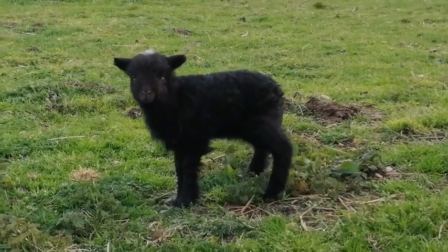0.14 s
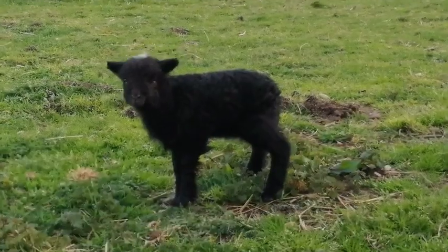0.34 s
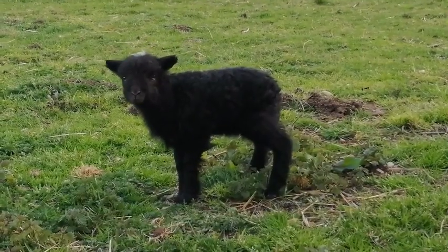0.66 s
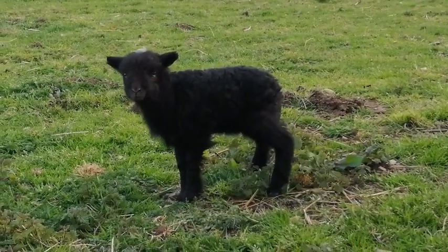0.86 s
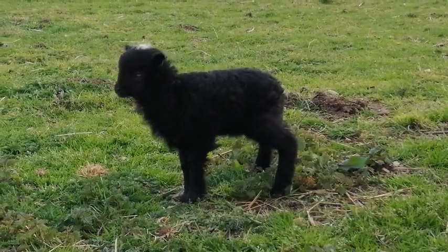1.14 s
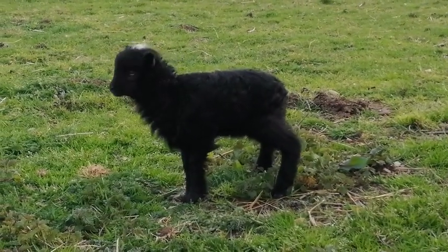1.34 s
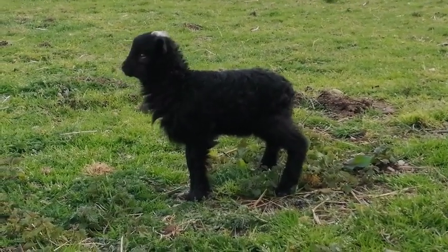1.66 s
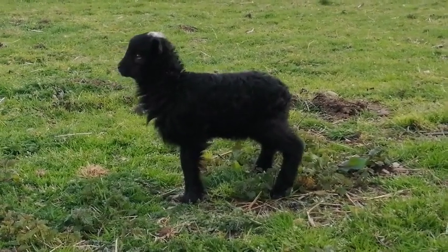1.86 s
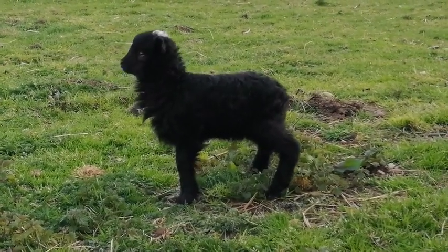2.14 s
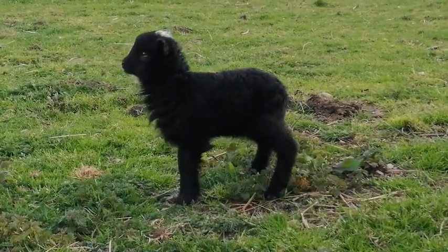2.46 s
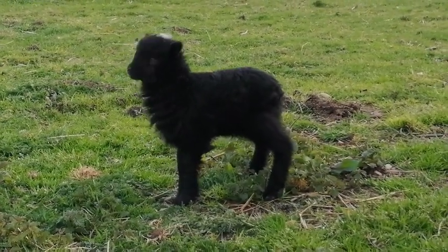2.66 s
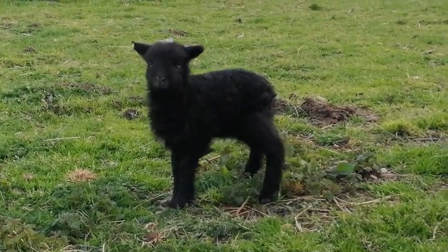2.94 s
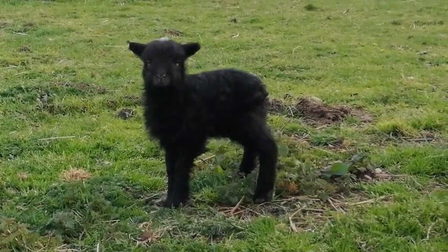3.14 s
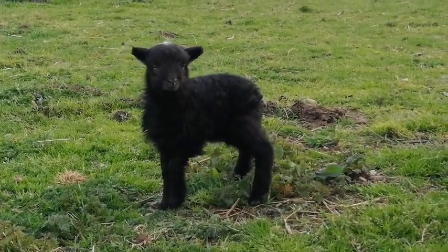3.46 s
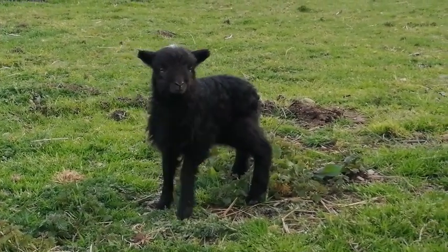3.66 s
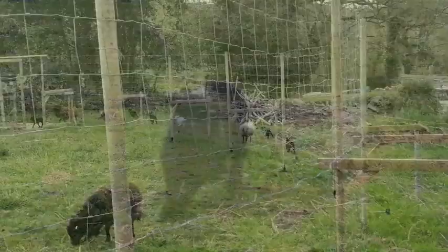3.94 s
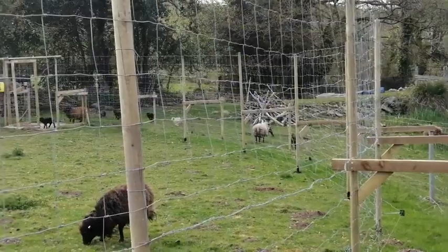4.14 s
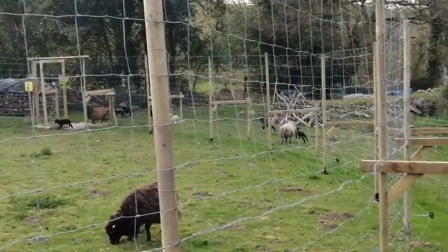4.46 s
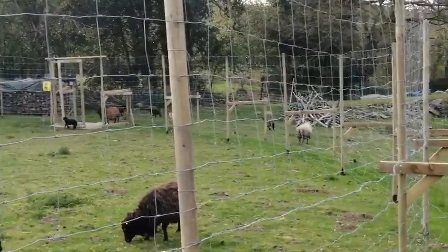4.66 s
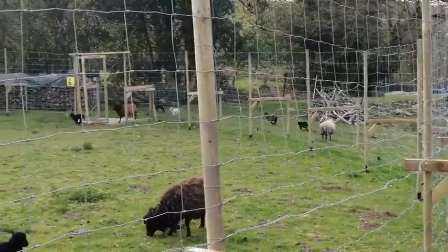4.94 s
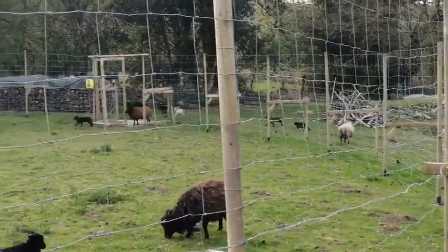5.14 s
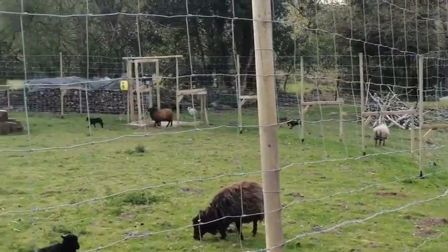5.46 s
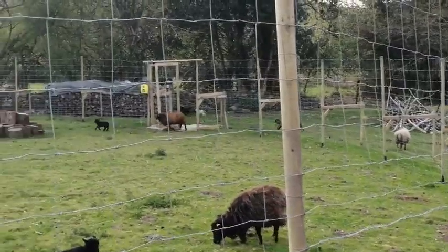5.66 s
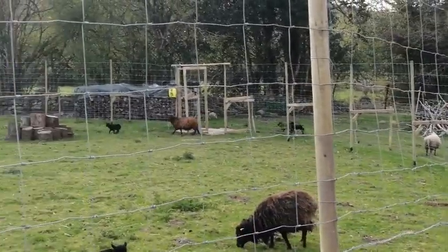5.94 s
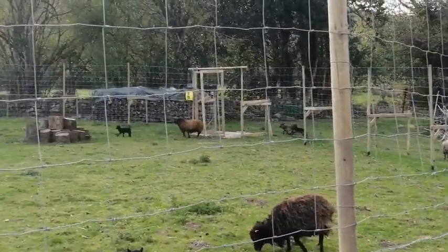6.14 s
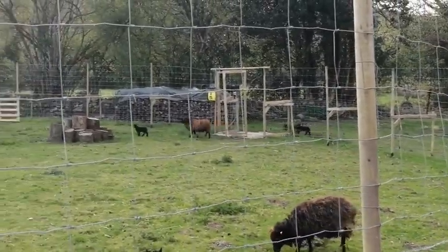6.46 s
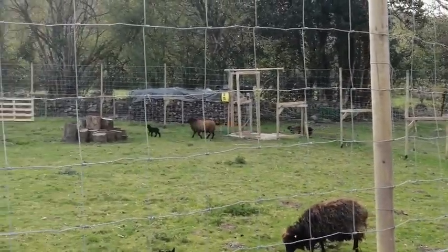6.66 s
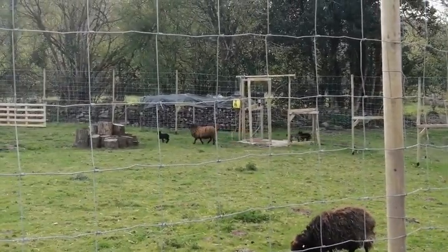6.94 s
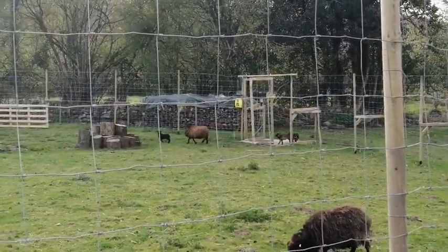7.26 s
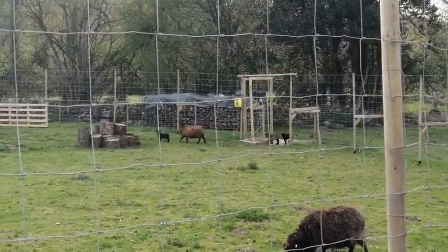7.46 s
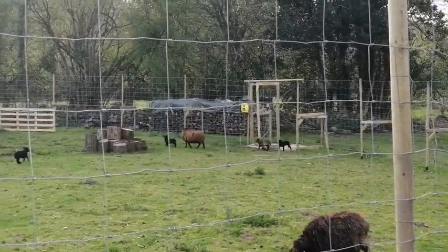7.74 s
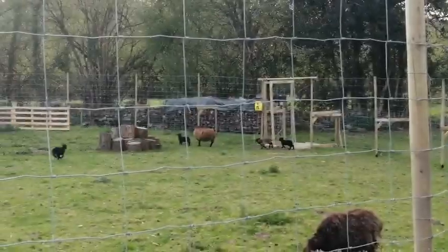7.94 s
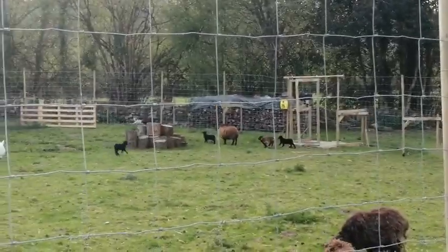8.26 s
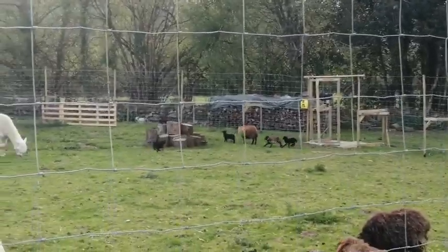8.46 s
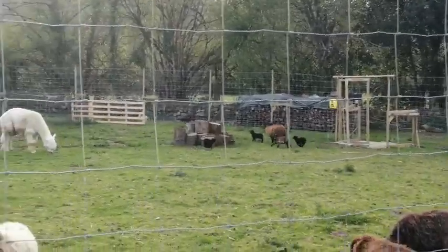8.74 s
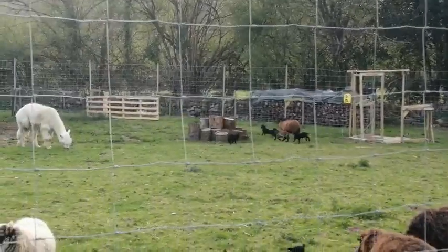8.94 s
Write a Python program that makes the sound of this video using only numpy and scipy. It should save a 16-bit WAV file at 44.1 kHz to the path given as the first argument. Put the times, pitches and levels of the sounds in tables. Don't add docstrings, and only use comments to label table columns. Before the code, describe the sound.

Outdoor pasture on a small handheld microphone. Faint hum, hiss and distant birds come first, then a lamb gives one nasal, quivering bleat. A louder ewe follows at once with a deep, rapidly throbbing bleat. A far lamb calls faintly, nearby songbirds whistle, soft hooves thud and wind bumps the microphone. A second ewe bleat, softer and duller, overlaps another distant lamb while birds keep singing.

```python
import sys
import numpy as np
from scipy import signal
from scipy.fft import rfft, irfft, next_fast_len
from scipy.io import wavfile
from scipy.ndimage import uniform_filter1d, map_coordinates

SR = 44100
rng = np.random.default_rng(int(sys.argv[2]) if len(sys.argv) > 2 else 0)


def transcribe(u):
    v = np.clip(np.atleast_2d(u).T, -1, 1)
    q = np.round(v * 32767).astype(np.int16)
    wavfile.write(sys.argv[1], SR, q)


def to_linear_factor(level_db):
    exponent = np.asarray(level_db, float) / 20
    return 10 ** exponent


N = 401751
TIME = np.arange(N) / SR
CHANGE_S = 3.69
VALLEY_HZ = 2054

# time into the note in seconds, pitch in Hz, level in dB.
SWOOP = [(0, 5390, -11.5), (.011, 6700, -16), (.02, 6510, -39), (.035, 5910, -18.5), (.053, 5580, 0),
         (.058, 5300, -16), (.068, 4600, -18.5), (.09, 3450, -31)]
RISE = [(0, 4280, -8.5), (.012, 4210, -3.5), (.03, 4500, -2), (.045, 5200, -2.5), (.058, 6700, -3.5)]
SLUR = [(0, 6600, -6), (.014, 7080, -1.5), (.05, 7130, -1.5), (.06, 7250, -8), (.1, 7600, -9.5)]
DROP = [(0, 6134, -16), (.011, 5940, 0), (.014, 5700, -9), (.024, 5490, -8.5)]
SEEP = [(0, 7440, -15.5), (.03, 7120, -3), (.08, 7100, -1), (.165, 6950, -8.5)]
FALL = [(0, 7710, -14.5), (.035, 6520, -10.5), (.048, 6450, 0.5), (.056, 6160, -15), (.082, 6400, -23.5),
        (.09, 5750, -5.5), (.115, 3950, -30)]
HOOK = [(0, 6050, -13), (.01, 7600, -26), (.02, 6620, 2), (.028, 6200, -24), (.036, 6400, -0.5),
        (.047, 6835, -3.5), (.056, 6700, -7)]
CREST = [(0, 5570, -9), (.03, 5640, -0.5), (.052, 6010, 2.5), (.07, 5500, -6), (.095, 4490, -21)]
DIP = [(0, 6200, -13), (.025, 5010, -5), (.045, 5000, 0), (.08, 5150, -9.5), (.16, 5190, -19)]
ARCH = [(0, 5900, -8), (.01, 6700, 5), (.022, 7640, -26), (.04, 7370, -4), (.055, 6900, 1.5)]
PIPE = [(0, 5170, -3), (0.031, 5280, -5.5), (0.061, 5100, -3.5)]
GLIDE = [(0, 5590, -10.5), (.03, 5424, 0), (.055, 5300, -13)]
FLICK = [(0, 5900, 2.5), (.008, 6090, -0.5), (0.014, 7230, -5.5)]
LIFT = [(0, 4220, -6.5), (0.022, 4300, 1), (.032, 4800, -4.5), (.044, 5270, 8)]
HOLD = [(0, 5770, -10), (.04, 5924, -4.5), (.085, 5850, -2), (.125, 5720, -24)]
CURL = [(0, 3080, -16), (.03, 2420, -1.5), (.055, 2400, -16), (.1, 3120, -13), (.125, 2800, -13),
        (.15, 2350, -2)]
WARBLE = [(0, 3085, 0), (.012, 2416, 3), (.021, 2620, -12), (.03, 3070, 7)]


def unit(x):
    return x / np.sqrt(np.mean(x ** 2) + 1e-20)


def along(points, hz):
    f, v = np.transpose(points)
    return np.interp(np.log(hz + 1), np.log(f + 1), v)


def curves(rows):
    s, *cols = np.transpose(rows)
    return [np.interp(TIME, s, c) for c in cols]


def wobble(rate):
    return map_coordinates(rng.standard_normal(int(N * rate / SR) + 4), [TIME * rate], order=1)


def lumps(rows, half_s):
    total = np.zeros(N)
    for s, db, *_ in rows:
        near = slice(round((s - 4 * half_s) * SR), round((s + 4 * half_s) * SR))
        total[near] += to_linear_factor(2 * db) * np.exp(-((TIME[near] - s) / half_s) ** 2)
    return np.sqrt(total)


def filtered(x, response):
    m = next_fast_len(len(x) + SR // 4)
    return irfft(rfft(x, m) * response(np.fft.rfftfreq(m, 1 / SR)), m)[:len(x)]


def rush(spectrum, patchy_db):
    z = signal.stft(rng.standard_normal(N), nperseg=512)[2]
    patches = uniform_filter1d(rng.standard_normal(z.shape), 6, 0)
    patches = uniform_filter1d(patches, 12, 1)
    patchy = signal.istft(z * to_linear_factor(patchy_db * unit(patches)), nperseg=512)[1][:N]
    return unit(filtered(patchy, lambda hz: to_linear_factor(along(spectrum, hz))))


def by_scene(before, after):
    return np.where(TIME < CHANGE_S, before, after)


def hum():
    # frequency in Hz, density in dB per Hz.
    hiss_spectrum = [(300, -20.5), (700, 5.5), (1300, -1.5), (3000, -1), (4250, -8), (5500, -10.5),
                     (7000, -13), (9000, -49.5)]
    # frequency in Hz, density in dB per Hz.
    drone_spectrum = [(30, -23), (70, -3.5), (330, 3), (600, -0.5), (850, -15), (1400, -36), (3000, -66)]
    # time in seconds, gain in dB.
    gain = [(0, 1.35), (2.3, 0.5), (2.5, -3.5), (3.2, -0.7), (3.5, 3.5), (3.7, -0.2), (5.5, 0.3), (7, -1),
            (9.11, 0)]
    gain_db, = curves(gain)
    hiss = to_linear_factor(by_scene(-72, -64) + gain_db + 10) * rush(hiss_spectrum, patchy_db=1.8)
    drone = to_linear_factor(by_scene(-60.5, -58) + 0.49 * gain_db + 3.5) * rush(drone_spectrum, patchy_db=2.0)
    return hiss + drone


def chorus():
    # frequency in Hz, density in dB per Hz.
    blur_spectrum = [(3000, -55), (4300, -14), (5200, -4), (5800, 1.5), (6900, -8.5), (7800, -13),
                     (9000, -66)]
    swell_db = 3 * np.cos(2 * np.pi * TIME / 2.5) * (TIME < CHANGE_S)
    return to_linear_factor(by_scene(-67.5, -57) + swell_db) * rush(blur_spectrum, patchy_db=2.2)


def wind():
    # frequency in Hz, density in dB per Hz.
    buffet_spectrum = [(10, -12), (35, 2), (70, -7), (130, -11.5), (300, -29.5), (800, -85)]
    # centre in seconds, peak in dB, half length in seconds.
    gusts = [(0.048, -85, .6), (1.877, -67, 0.13), (4.065, -66, .2), (4.84, -65, 0.036), (5.12, -56, 0.06),
             (6.025, -64, 0.2), (6.211, -50.5, 0.08), (6.622, -52.5, 0.023), (7.241, -70.5, 0.085),
             (7.537, -40, 0.087), (7.71, -48.5, 0.059), (8.072, -49, 0.068), (8.212, -54, 0.04),
             (8.867, -50, 0.045)]
    calm_db = -79.5
    force = to_linear_factor(calm_db) + sum(to_linear_factor(db) * np.exp(-((TIME - s) / length) ** 2) for s, db, length in gusts)
    return force * unit(to_linear_factor(1.5 * wobble(14)) * rush(buffet_spectrum, patchy_db=.6))


def hooves():
    # start in seconds, peak in dB, pitch in Hz.
    thuds = [(0.071, -49.5, 160), (1.819, -65, 100), (4.801, -43.5, 150), (5.12, -44, 125),
             (5.88, -50.5, 200), (6.456, -45, 147.3), (8.169, -45.5, 170.1)]
    total = np.zeros(N)
    for s, db, hz in thuds:
        envelope = np.exp(-((TIME - s - .03) / 0.02) ** 2)
        total += to_linear_factor(db) * envelope * np.sin(2 * np.pi * hz * TIME)
    return total


def trees(x, delay):
    # frequency in Hz, time to fall by 60 dB in seconds.
    decay = [(200, .25), (2000, 0.46), (6000, 0.32), (10000, 0.17)]
    hz, t, z = signal.stft(rng.standard_normal(SR // 2), SR, nperseg=256)
    fall_db = -60 * t / along(decay, hz)[:, None]
    tail = signal.istft(z * to_linear_factor(fall_db), SR, nperseg=256)[1]
    late = np.pad(x, (round(delay * SR), 0))
    return signal.fftconvolve(late, tail / np.linalg.norm(tail))[:N]


def turf(x, delay, db):
    return x - to_linear_factor(db) * np.pad(x, (round(delay * SR), 0))[:N]


def whistle(out, s, shape, db, scale, fade_db):
    when, hz, level = np.transpose(shape)
    t = np.arange(int(when[-1] * SR)) / SR
    edge = np.clip(np.minimum(t, t[-1] - t) / 0.0016, 0, 1)
    flicker = np.interp(t * 130, np.arange(40), rng.standard_normal(40))
    tone = np.sin(2 * np.pi * np.cumsum(scale * np.interp(t, when, hz)) / SR)
    out[round(s * SR):][:len(t)] += to_linear_factor(db + np.interp(t, when, level) + fade_db * flicker) * edge * tone


def sing(phrases, singles, fade_db):
    out = np.zeros(N + SR)
    for shape, start, notes, spacing, db, scale in phrases:
        for k in range(notes):
            whistle(out, start + k * spacing, shape, db, scale, fade_db)
    for shape, s, db, scale in singles:
        whistle(out, s, shape, db, scale, fade_db)
    return out


def far_birds():
    # shape, start in seconds, notes, spacing in seconds, peak in dB, pitch scale.
    phrases = [(SLUR, 0, 3, .168, -57.5, 1), (WARBLE, .002, 4, .03, -57, 1), (WARBLE, .775, 4, .03, -58, 1),
               (PIPE, .11, 2, .11, -56, 1.165), (DROP, .728, 2, .315, -54, .85),
               (DROP, .226, 2, .205, -60, 1), (HOLD, 1.31, 3, .157, -48, .995),
               (LIFT, 1.499, 7, .1176, -59.5, 1), (PIPE, 1.49, 2, .34, -61.5, .74),
               (DROP, 2.81, 4, .215, -49.5, .87)]
    # shape, start in seconds, peak in dB, pitch scale.
    singles = [(DROP, .195, -55, .76), (PIPE, .43, -61, 1.38), (CURL, .485, -51, 1),
               (GLIDE, .522, -54, .755), (SLUR, .66, -56, .8), (HOLD, .97, -60, 1.21),
               (HOLD, 1.13, -58, .81), (HOLD, 1.72, -54, 1.01), (PIPE, 2.085, -56, .8),
               (GLIDE, 2.255, -53, .71), (PIPE, 2.565, -47, .99), (PIPE, 4.77, -50, 1.1),
               (DROP, 4.86, -50, .99)]
    # start in seconds, end in seconds, ticks a second, peak in dB, pitch scale.
    trills = [
        (7.447, 7.885, 33.2, -46, 1),
        (.322, .85, 18.1, -62.5, .72),
    ]
    # time into the note in seconds, pitch in Hz, level in dB.
    tick = [(0, 7230, -2.5), (.004, 6610, 0.5), (.009, 5420, -0.5)]
    out = sing(phrases, singles, fade_db=3.2)
    for start, end, rate, db, scale in trills:
        slowed = [(t / scale, hz, level) for t, hz, level in tick]
        for s in np.arange(start, end, 1 / rate):
            whistle(out, s, slowed, db, scale, fade_db=5.0)
    chatter_notes, chatter_db, spread_db = 70, -68, 2.5
    for when, kind, pitch, size in rng.random((chatter_notes, 4)):
        s = when * N / SR
        shape = (DROP, GLIDE, FLICK, PIPE, LIFT)[int(5 * kind)]
        db = chatter_db + spread_db * 2 * size + 5 * (s > CHANGE_S)
        whistle(out, s, shape, db, .72 + .4 * pitch, fade_db=5.5)
    return out[:N]


def near_birds():
    # shape, start in seconds, notes, spacing in seconds, peak in dB, pitch scale.
    phrases = [(SWOOP, 5.297, 4, .142, -28, 1), (RISE, 8.031, 6, .115, -38, 1),
               (SLUR, 6.508, 3, .174, -35, 1), (DROP, 6.618, 3, .174, -27, 1),
               (SEEP, 5.9, 2, 2.81, -36.5, 1), (PIPE, 6.112, 1, .078, -42, 1),
               (PIPE, 6.4, 1, .08, -42, .925)]
    # shape, start in seconds, peak in dB, pitch scale.
    singles = [(GLIDE, 4.903, -38, 1), (DROP, 5.015, -48, .74), (FALL, 5.139, -33, 1),
               (DROP, 6.242, -46, .87), (HOOK, 6.288, -29, 1), (PIPE, 6.19, -49, 1), (DROP, 6.447, -37, .8),
               (PIPE, 6.48, -51, .925), (PIPE, 7.072, -45, .8), (CREST, 7.186, -30, 1),
               (DROP, 7.42, -47, 1.24), (ARCH, 7.92, -38, 1), (DIP, 8.947, -33, 1), (FLICK, 9.09, -40, 1)]
    return sing(phrases, singles, fade_db=2.2)[:N]


def throat(x, modes, lift=1):
    roof_hz = 3800
    f = np.fft.rfftfreq(4096, 1 / SR) + 1
    power = 0
    for centre, width, db in modes:
        if centre > VALLEY_HZ:
            centre = centre * lift ** max(0, (roof_hz - centre) / (roof_hz - VALLEY_HZ))
        power = power + to_linear_factor(2 * db) / (1 + ((centre ** 2 - f * f) / (f * width)) ** 2) ** 3
    cepstrum = irfft(np.log(power + 1e-9) / 2)
    cepstrum[1:2048] *= 2
    cepstrum[2049:] = 0
    return signal.oaconvolve(x, irfft(np.exp(rfft(cepstrum))))[:N]


def folds(pitch_hz, on, jitter, scatter_db, rough):
    cycle = np.cumsum(pitch_hz * (1 + jitter * wobble(120))) / SR
    size = to_linear_factor(scatter_db * rng.standard_normal(N // 64))[cycle.astype(int)]
    part = cycle % 1
    snaps = -np.diff(np.floor(cycle), prepend=0) * size
    air = filtered(rng.standard_normal(N), lambda hz: hz ** 4 / (hz ** 4 + 800 ** 4))
    puffs = size * np.exp(-part / .3) * air
    rough = np.clip(rough, 0, 1)
    snaps = snaps / np.sqrt(np.mean(snaps[on] ** 2))
    puffs = puffs / np.sqrt(np.mean(puffs[on] ** 2))
    return (np.sqrt(1 - rough) * snaps + np.sqrt(rough) * puffs) * on


def far_bleat(rows, modes, rough):
    db, hz = curves(rows)
    on = (TIME > rows[0][0]) & (TIME < rows[-1][0])
    voice = throat(folds(hz, on, jitter=.004, scatter_db=1.5, rough=rough), modes)
    return to_linear_factor(db + 1.6 * wobble(23)) * voice / np.std(voice[on])


def far_lambs():
    # time in seconds, level in dB, pitch in Hz.
    call = [(4.6, -72, 301), (4.75, -68, 294), (4.96, -56.5, 297.7), (5.1, -59, 308.2), (5.3, -56.5, 317.7),
            (5.52, -59.5, 319.4), (5.7, -60, 311.6), (5.9, -57, 293), (5.97, -67, 286)]
    # resonance in Hz, width in Hz, level in dB.
    call_modes = [(964, 100, 4.5), (2180, 410, -6), (2720, 360, -2.5), (3150, 710, 1.5), (3430, 410, 1)]
    # time in seconds, level in dB, pitch in Hz.
    answer = [(7.22, -68, 340.3), (7.3, -51, 338.2), (7.5, -51.5, 333.5), (7.75, -50, 323),
              (7.95, -55, 310), (8.15, -66, 308)]
    # resonance in Hz, width in Hz, level in dB.
    answer_modes = [(976, 134, 5), (2730, 470, -5), (3310, 390, 1.5), (3590, 380, 0)]
    return far_bleat(call, call_modes, rough=.06) + far_bleat(answer, answer_modes, rough=.3)


def lamb():
    # time in seconds, level in dB, pitch in Hz.
    bleat = [(2.26, -67, 227.2), (2.314, -66, 231.8), (2.318, -46, 227.9), (2.4, -41.5, 206.2),
             (2.75, -40.5, 219.8), (3.0, -40.5, 218.1), (3.27, -42, 199.9), (3.47, -47, 180.7),
             (3.49, -52, 178.8)]
    # resonance in Hz, width in Hz, level in dB.
    body_modes = [(2152, 276, 5), (2425, 240, 4.5), (2800, 335, 3.5), (3440, 184, -1)]
    # resonance in Hz, width in Hz, level in dB.
    edge_modes = [(5900, 370, 0.2), (6700, 2200, -1.2)]
    # resonance in Hz, width in Hz, level in dB.
    low_modes = [(422, 130, -14), (634, 105, -4.5), (740, 250, -9.5), (916, 135, 4)]
    # time in seconds, cycles so far.
    flutter = [(2.32, 0), (2.353, 1), (2.403, 3), (2.549, 8), (2.625, 11), (2.98, 24), (3.143, 29),
               (3.29, 33), (3.464, 37), (3.7, 42)]
    # centre in seconds, level in dB.
    bead_rows = [(2.336, -5), (2.391, -2.5), (2.474, 0.5), (2.538, 3.5), (2.592, 2.5), (2.612, -1),
                 (2.641, -3.5), (2.668, 1.5), (2.69, -2.5), (2.751, 1), (2.802, -1.5), (2.829, -2.5),
                 (2.885, 0), (2.912, -10), (2.94, -6), (2.968, -5.5), (3.013, -4.5), (3.049, -8),
                 (3.346, -3.5), (3.382, -6.5), (3.456, 1.5)]
    start, shut, end = bleat[0][0], bleat[-2][0], bleat[-1][0]
    db, hz = curves(bleat)
    on = (TIME > start) & (TIME < end + 0.14)
    edge_db = 4 - 11 * (TIME - start) * on - 16 * (TIME > shut)
    saw = uniform_filter1d(curves(flutter)[0] % 1, size=130) - .5
    saw = saw * (TIME < end)
    beads = lumps(bead_rows, half_s=.011)

    bead_rise = .05 * beads.clip(0, 1) * np.clip((2.85 - TIME) / .3, 0, 1)
    pitch = hz * (1 + .022 * saw + bead_rise + .006 * wobble(30))
    jitter = .011 + .015 * np.exp(-abs(TIME - 2.3) / .3)
    source = folds(pitch, on, jitter=jitter, scatter_db=1.3, rough=.22 + .6 * (TIME > shut))
    level = to_linear_factor(db - .5 * np.cos(2 * np.pi * saw - 2.6))
    source = source * level / np.std(throat(source, body_modes)[on])

    drift = np.maximum((TIME - 2.75) / 1.41, (2.4 - TIME) / 0.11).clip(0)
    closing = np.clip(drift + 0.18 + .6 * saw + 0.074 * wobble(33), 0, 1)
    body = throat(source * (1 - closing), body_modes, lift=0.99)
    body = body + throat(source * closing, body_modes, lift=1.167)
    nasal = to_linear_factor(2.4 * wobble(35) - 0.5) * np.clip((TIME - 2.2) / 0.4, 0, 1)
    nose = throat(source * nasal, low_modes[:-1])
    beaded = throat(source * (beads + to_linear_factor(-16)), low_modes[-1:])
    edge = throat(source * to_linear_factor(edge_db - 8 * saw), edge_modes)
    return body + nose + beaded + edge


def throb_swell(throbs, late, rise, fall):
    total = np.zeros(N)
    for centre, width, *_ in throbs:
        peak = centre + late
        side = np.where(TIME < peak, rise * width, fall * width)
        total += np.exp(-.5 * ((TIME - peak) / side) ** 2)
    return total


def ewe(throbs, rasps, modes, between_db, sag, lift, rough):
    # resonance in Hz, width in Hz, level in dB.
    shut_modes = [(3980, 370, -11)]
    s, _, db, hz = np.transpose(throbs)
    on = (TIME > s[0] - .042) & (TIME < s[-1] + .07)
    push = throb_swell(throbs, 0.0044, 1.306, 0.46)
    effort = np.tanh(1.54 * push)
    strain = throb_swell(throbs, .006, 1.3, 1.1).clip(0, 1)
    pitch = np.interp(TIME, s, hz) * (1.01 - sag * (1 - strain))
    raw = folds(pitch, on, jitter=.017, scatter_db=1.5, rough=rough)
    low = [m for m in modes if m[0] < VALLEY_HZ]
    upper = [m for m in modes if m[0] > VALLEY_HZ]

    throb_db = np.interp(TIME, s, db)
    breath = to_linear_factor(throb_db) * (effort + to_linear_factor(between_db))
    source = raw * breath * to_linear_factor(.8 * wobble(80)) / np.std(throat(raw, modes)[on])
    chest = throat(source * effort ** 0.76, low)

    when, _, jaw = np.transpose(rasps)
    closure = 0.8 * np.interp(TIME, when, jaw) + 0.18 - 0.34 * push + 0.058 * wobble(40)
    shut = 4 * np.clip(closure, 0, 1)
    steady = to_linear_factor(-12) * breath + to_linear_factor(-27 + throb_db)
    rattle = raw * np.hypot(lumps(rasps, half_s=.0065), steady) / np.std(throat(raw, upper)[on])
    sweep = np.zeros(N)
    for k in range(5):
        sweep += throat(rattle * np.clip(1 - abs(shut - k), 0, 1), upper, lift ** (k / 4))
    progress = (TIME - s[0]) / (s[-1] - s[0])
    fresh = throat(rattle * 3.1 * np.clip(1 - 2.3 * progress, 0, 1), modes[-1:])
    nearly_shut = throat(rattle * np.clip(.5 * shut - 1.2, 0, 1), shut_modes)
    return chest + sweep + fresh + nearly_shut


def ewe_away():
    # centre in seconds, half width in seconds, level in dB, pitch in Hz.
    throbs = [(7.248, 0.015, -37.5, 203.2), (7.332, 0.021, -34.5, 204.2), (7.393, 0.017, -30.5, 222),
              (7.468, 0.014, -28, 223.4), (7.547, 0.015, -30, 222), (7.621, 0.017, -27.5, 231.3),
              (7.698, 0.018, -29, 230.1), (7.779, 0.019, -32, 228.1), (7.865, 0.015, -29.5, 226),
              (7.936, 0.014, -30, 226), (8.025, 0.017, -27.5, 222), (8.103, 0.016, -30.5, 223.4)]
    # centre in seconds, level in dB, jaw closure from 0 to 1.
    rasps = [(7.238, -44, 0.67), (7.26, -54, 0.3), (7.298, -41.5, 0.89), (7.332, -32.5, 0.96),
             (7.374, -36, 0.31), (7.389, -30.5, 0.58), (7.408, -35.5, 0.36), (7.432, -46, 0.54),
             (7.456, -28.5, 0.61), (7.477, -30, 0.3), (7.53, -29.5, 0.68), (7.553, -29, 0.47),
             (7.598, -34.5, 0.48), (7.622, -27, 0.41), (7.658, -44, 0.51), (7.677, -34, 0.34),
             (7.696, -27, 0.63), (7.761, -32.5, 0.33), (7.779, -27, 0.44), (7.854, -29.5, 0.3),
             (7.874, -31, 0.21), (7.918, -31, 0.53), (7.942, -28.5, 0.34), (8.003, -36, 0.7),
             (8.025, -29.5, 0.66), (8.073, -39, 0.49), (8.104, -30.5, 0.74), (8.131, -57, 0.61),
             (8.162, -57, 0.64)]
    # resonance in Hz, width in Hz, level in dB.
    modes = [(222, 200, -3.5), (919, 264, -0.5), (1681, 160, -7), (2150, 620, 0.5), (2854, 180, 8),
             (3470, 300, -8), (6200, 3800, -34)]
    return ewe(throbs, rasps, modes, between_db=-27, sag=.1, lift=1.3, rough=0.16)


def ewe_near():
    # centre in seconds, half width in seconds, level in dB, pitch in Hz.
    throbs = [(3.722, 0.015, -20.5, 226), (3.799, 0.016, -19.5, 232.1), (3.873, 0.014, -20.5, 234.8),
              (3.951, 0.014, -21, 230.7), (4.027, 0.013, -21, 228.5), (4.109, 0.016, -19.5, 223.6),
              (4.19, 0.019, -20.5, 230.5), (4.269, 0.014, -20, 232.3), (4.354, 0.02, -24, 225.1),
              (4.433, 0.013, -20, 229.2), (4.484, 0.006, -32.5, 216.3)]
    # centre in seconds, level in dB, jaw closure from 0 to 1.
    rasps = [(3.694, -37, 0.4), (3.71, -25, 0.05), (3.735, -23, 0.4), (3.771, -33, 0.03), (3.789, -23, 0.4),
             (3.811, -22, 0.48), (3.85, -32, .2), (3.866, -23.5, 0.48), (3.885, -28.5, 0.12),
             (3.899, -42, 0.9), (3.92, -43, 0.85), (3.936, -26, 0.2), (3.953, -23.5, 0),
             (3.97, -32.5, 0.62), (4.006, -28, 0.17), (4.021, -22, 0.43), (4.039, -27.5, 0.62),
             (4.054, -43, 1), (4.08, -40, 0), (4.098, -25, .25), (4.118, -33, 0.27), (4.128, -40, 0.98),
             (4.152, -32.5, 1), (4.175, -26, .4), (4.198, -26, 0.22), (4.223, -32, 0.83),
             (4.241, -34.5, 0.63), (4.267, -24.5, 0.5), (4.3, -42, 1), (4.327, -36, 0.7),
             (4.341, -32, 0.14), (4.356, -24.5, 0.66), (4.385, -45, .85), (4.406, -36.5, 0.82),
             (4.435, -26.5, 0.81), (4.465, -40, 0.95), (4.485, -59, 0.36)]
    # resonance in Hz, width in Hz, level in dB.
    modes = [(226, 194, -17), (767, 188, -10), (889.3, 124, 5.5), (1400, 360, -34), (1615, 130, -23.5),
             (2136, 373, -2.5), (2800, 250, -5), (3267, 413, -10.5), (6400, 2440, -35)]
    return ewe(throbs, rasps, modes, between_db=-38, sag=0.14, lift=1.35, rough=0.2)


def scene():
    ground = hum() + chorus() + wind() + hooves()
    near_song, far_song = near_birds(), far_birds()
    song = near_song + far_song + trees(to_linear_factor(-12.5) * near_song + to_linear_factor(-7.5) * far_song, delay=0.0044)
    distant, young, away, close = far_lambs(), lamb(), ewe_away(), ewe_near()
    echoes = trees(to_linear_factor(-21.5) * (close + young) + to_linear_factor(-14) * away + to_linear_factor(-5) * distant, delay=.012)
    direct = turf(close, delay=0.002333, db=-10) + young + turf(away, delay=0.00169, db=-6) + distant
    return (direct + echoes + song + ground)[None]


def roll_off(x):
    return signal.sosfilt(signal.butter(12, 15400, fs=SR, output="sos"), x)


def record(dry):
    # frequency in Hz, gain in dB.
    treble = [(7000, 0), (7400, -6), (7700, -26), (8000, -44.5), (8600, -77)]
    # centre in seconds, peak in dB.
    crackles = [(2.5066, -78), (2.5358, -59), (2.565, -49.5), (2.712, -53), (2.7733, -61.5), (3.2172, -63)]
    bursts = sum(to_linear_factor(db + 1.5) * np.exp(-((TIME - s) / .0013) ** 2) for s, db in crackles)
    ticks = bursts * rng.standard_normal(N)
    heard = filtered(dry[0], lambda hz: to_linear_factor(along(treble, hz)))
    heard = heard + filtered(ticks, lambda hz: (hz > 8200) * (9000 / (hz + 1)) ** 3)
    return roll_off(heard[None])


dry = scene()
out = record(dry)
transcribe(out)
```